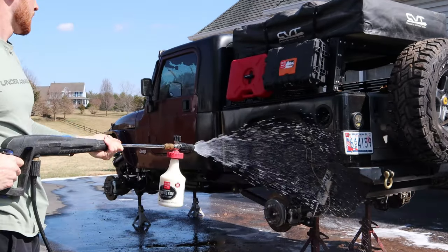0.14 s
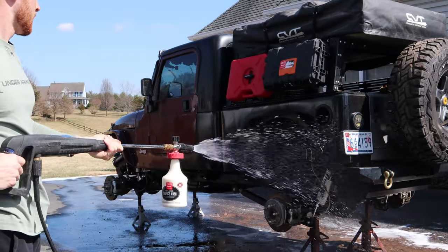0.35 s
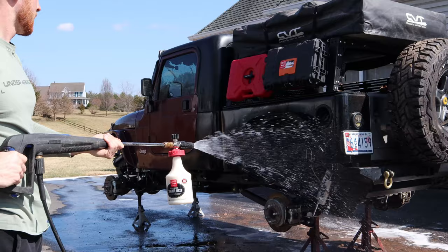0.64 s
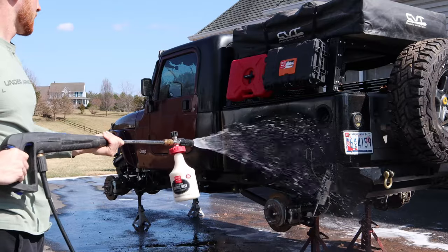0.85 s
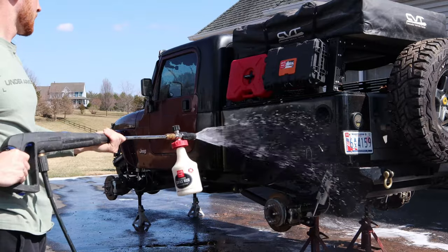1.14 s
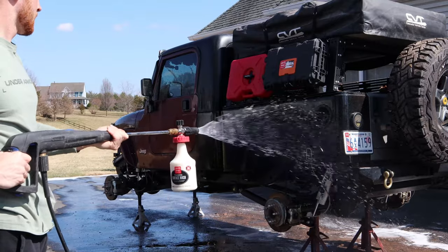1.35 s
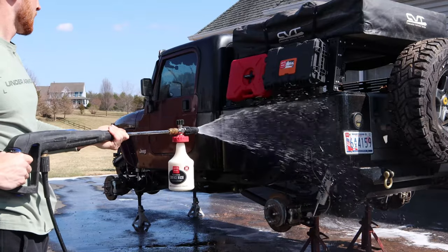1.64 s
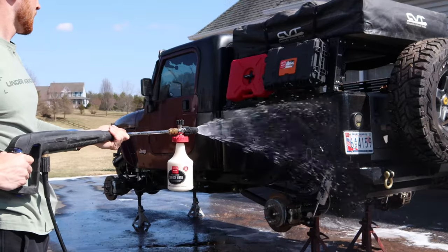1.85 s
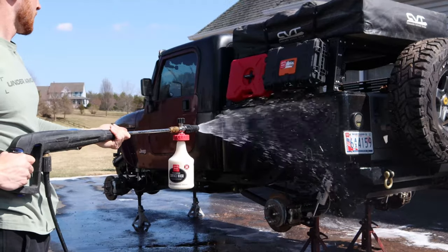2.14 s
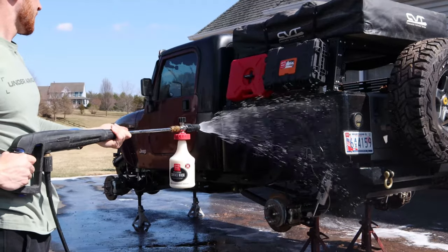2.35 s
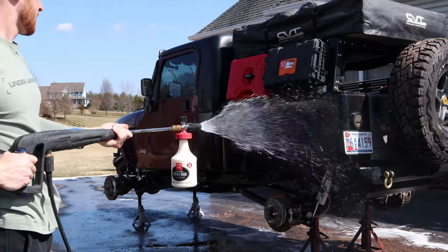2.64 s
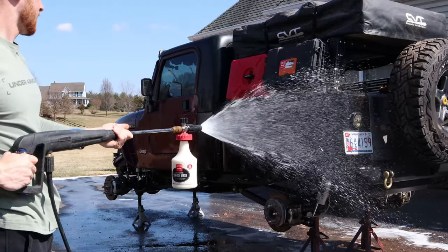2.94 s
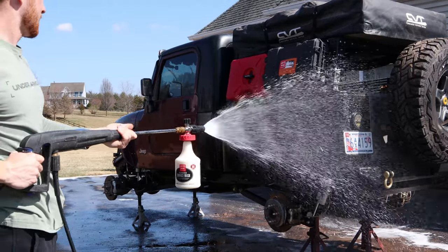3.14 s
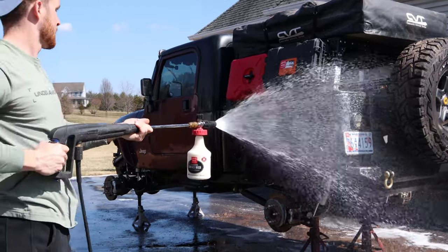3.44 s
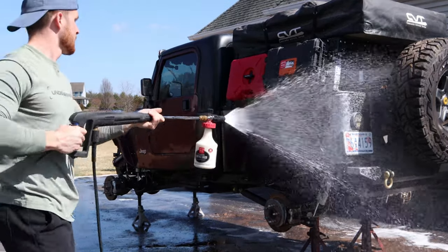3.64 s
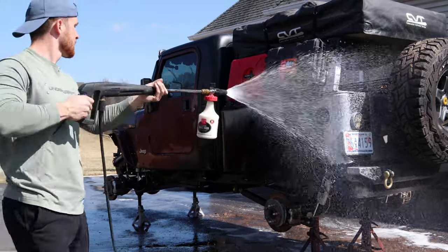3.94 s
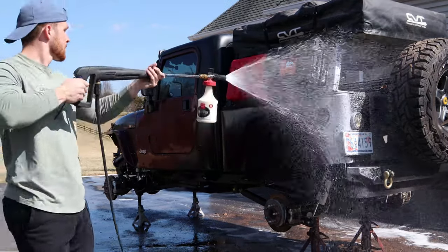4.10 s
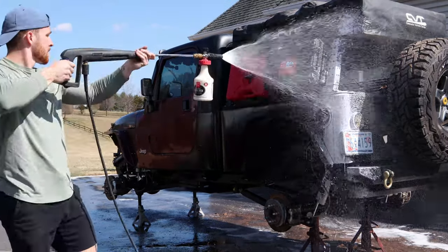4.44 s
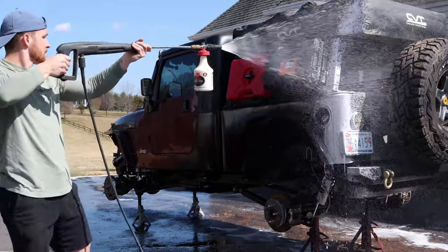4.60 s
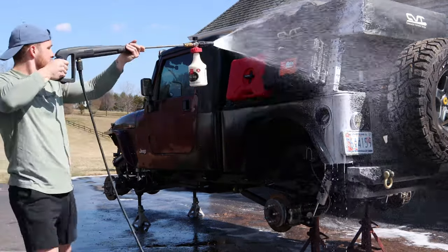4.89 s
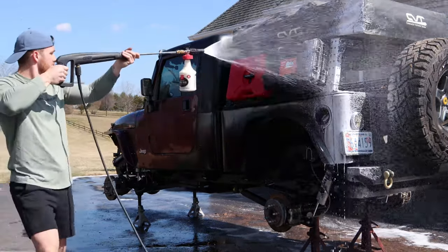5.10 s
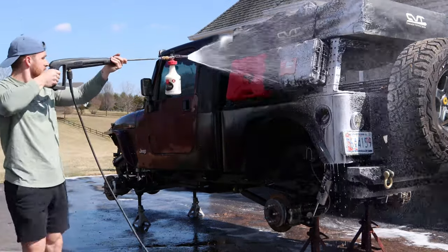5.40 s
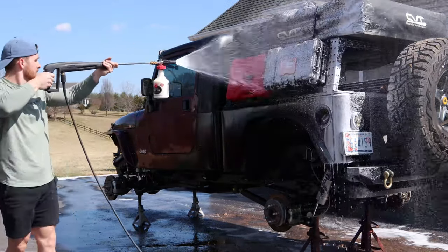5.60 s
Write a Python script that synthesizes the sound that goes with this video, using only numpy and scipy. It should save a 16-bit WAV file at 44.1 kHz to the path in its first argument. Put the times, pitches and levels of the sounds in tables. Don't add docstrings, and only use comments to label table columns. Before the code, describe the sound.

Rapid mechanical drone and rattle of a pressure washer, strongly to the left, over bright hissing spray with occasional wet slaps on bodywork.

```python
import sys
import numpy as np
from scipy import signal
from scipy.fft import rfft, irfft
from scipy.io import wavfile
from scipy.ndimage import uniform_filter1d

SR = 44100
rng = np.random.default_rng(int(sys.argv[2]) if len(sys.argv) > 2 else 0)


def master(y):
    cut = np.clip(np.atleast_2d(y).T, -1, 1)
    pcm = np.round(cut * 32767)
    wavfile.write(sys.argv[1], SR, pcm.astype(np.int16))


def undo_db(level):
    steps = np.asarray(level, float) / 20
    return 10 ** steps


N = 254016
HZ = np.maximum(np.fft.rfftfreq(N, 1 / SR), 1)
HOLD = 16
SHAFT_HZ = 70.505

# start_s, load (1 straining, 0 steady, -1 shifted)
PUMP_LOAD = [(0, .8), (.12, 1), (.45, 1), (.65, 0), (4.4, 0), (4.47, -.7), (4.6, -1), (4.93, -1),
             (5.04, -.4), (5.3, -.1), (5.45, .3), (5.76, .3)]
# freq_hz, level_db [dB per Hz]
CASING_COLOUR = [(90, -76.5), (176, -54.5), (387, -40), (669, -42.5), (1021, -43.5), (1900, -45.5),
                 (2450, -48.5), (3040, -53), (3900, -45), (5104, -47), (6230, -54.5), (7200, -50),
                 (8200, -59), (11000, -72)]
# freq_hz, left_minus_right_db
PORT_SHADOW = [(60, -.5), (110, -1), (200, 3.5), (380, 9.5), (700, 11.5), (1290, 15.5), (2380, 18),
               (4400, 19.5), (8120, 23), (15000, 26)]
# freq_hz, lag_rad
LAG_BETWEEN_PORTS = [(60, 0), (140, .4), (210, 1.1), (340, 1.4), (1030, 1.6), (3000, .8), (5300, 1.6),
                     (7200, 6.9), (15000, 17)]
# shaft_multiple, level_db, left_minus_right_db
GEAR_TONES = [(40, -44, 14), (45, -44, 21), (46, -42, 22), (49, -38, 20), (50, -28, 21), (52, -45, 19),
              (53, -45, 19), (59, -37, 22), (60, -39, 21), (61, -44, 25), (66, -40, 21), (68, -36, 25),
              (76, -45, 16), (78, -42, 33)]
# shaft_multiple, level_db, left_minus_right_db
FAN_TONES = [(93, -40, 19), (94, -47, 13), (96, -43, 17), (97, -46, 15), (98, -41, 18), (100, -32, 26),
             (101, -33, 15), (102, -38, 13), (103, -39, 17), (104, -42, 21), (106, -44, 20), (110, -48, 11),
             (111, -49, 15), (150, -55, 16)]


def on_log(table, hz):
    f, v = np.transpose(table)
    return np.interp(np.log(hz), np.log(f), v)


def curve(table):
    s, *columns = np.transpose(table)
    return [np.interp(np.arange(N) / SR, s, c) for c in columns]


def shifted_load():
    return np.clip(-curve(PUMP_LOAD)[0], 0, 1)


def level(x, db):
    return x * undo_db(db) / np.sqrt(np.mean(np.atleast_2d(x)[0] ** 2))


def walk(rate_hz):
    k, steps = int(SR / HOLD / rate_hz), N // HOLD
    held = np.repeat(rng.standard_normal(steps // k + 1), k)
    return 0.61 * uniform_filter1d(uniform_filter1d(held, k), k)[:steps]


def ports(near, other):
    # freq_hz, coherence [0-1]
    coherence = [(60, 0.87), (300, 0.78), (700, 0.93), (1400, 0.2), (3000, 0.7), (6000, 0), (9000, 0.1),
                 (15000, 0)]
    like = np.clip(on_log(coherence, HZ), 0, 1)
    late = near * np.exp(-1j * on_log(LAG_BETWEEN_PORTS, HZ))
    far = like * late + np.sqrt(1 - like ** 2) * other
    return np.array([near, far * undo_db(-on_log(PORT_SHADOW, HZ))])


def noise(colour, excite, flicker_db, gate=lambda hz: 1):
    both = ports(*rfft(excite)) * undo_db(on_log(colour, HZ))
    out, low_hz, high_hz = 0, colour[0][0], colour[-1][0]
    for hz in low_hz * 2 ** np.arange(0, np.log2(high_hz / low_hz) + .5, .5):
        band = np.cos(np.pi * np.clip(np.log2(HZ / hz), -.5, .5)) ** 2
        flicker = np.repeat(undo_db(flicker_db * walk(9)), HOLD)
        out = out + gate(hz) * flicker * irfft(both * band, N)
    return out


def order(turn, k, db, side_db, start):
    angle = ((k * turn + np.repeat(start, HOLD)) % (2 * np.pi)).astype(np.float32)
    size = np.sqrt(2) * np.repeat(undo_db(db), HOLD)
    lag = np.float32(on_log(LAG_BETWEEN_PORTS, k * SHAFT_HZ))
    return np.array([size * np.cos(angle), undo_db(-side_db) * size * np.cos(angle - lag)])


def shaft_turn():
    t = np.arange(N) / SR
    run_up_hz, run_up_s, sag_hz_per_s, ease_hz = 1.45, .25, .017, .06
    speed_hz = SHAFT_HZ - run_up_hz * np.exp(-t / run_up_s) - sag_hz_per_s * t + ease_hz * shifted_load()
    return 2 * np.pi * np.cumsum(speed_hz) / SR


def pump(turn):
    # shaft_multiple, steady_db, straining_db, warm_db, shifted_db
    knock_orders = [(1, -59, -59, -59, -61), (2, -58, -55, -57, -70), (3, -31, -30, -32, -42),
                    (4, -32, -37, -32, -26), (5, -23, -21, -26, -22), (6, -25, -26, -25, -30),
                    (7, -31, -37, -32, -25), (8, -29, -30, -28, -35), (9, -24, -22, -22, -32),
                    (10, -32, -29, -27, -23), (11, -32, -34, -32, -31), (12, -47, -41, -35, -45),
                    (13, -28, -30, -28, -41), (14, -30, -28, -30, -42), (15, -46, -39, -41, -31)]
    # shaft_multiple, level_db
    valve_orders = [(16, -41), (17, -40), (18, -43), (20, -37), (21, -43), (22, -39), (23, -42), (25, -40),
                    (26, -41), (27, -41), (28, -45), (30, -36), (31, -41)]
    casing_hz = np.array([429, 495, 550, 580, 876, 908, 956])
    warm_at_s, warming_s = 3.35, 0.53
    load = curve(PUMP_LOAD)[0][::HOLD]
    strain, shift = np.clip(load, 0, 1), np.clip(-load, 0, 1)
    warm = np.clip((np.arange(len(load)) * HOLD / SR - warm_at_s) / warming_s, 0, 1)
    rows = knock_orders + [(k, db, db + 1.5, db, db - 1.5) for k, db in valve_orders]
    out, chances = 0, rng.uniform(-np.pi, np.pi, len(rows))
    for (k, db, strain_db, warm_db, shift_db), chance in zip(rows, chances):
        hz = k * SHAFT_HZ
        lag = 0.929 * np.sum(np.pi / 2 + np.arctan(np.subtract(hz, casing_hz) / 12))
        start = 0.448 * k - 3.3 - lag + chance * (k >= valve_orders[0][0])
        rest_db = db + warm * (warm_db - db)
        now_db = rest_db + strain * (strain_db - rest_db) + shift * (shift_db - rest_db)
        now_db = now_db + 0.19 * walk(9)
        out = out + order(turn, k, now_db, on_log(PORT_SHADOW, hz), start + .12 * walk(14))
    return out


def whine(turn, top_db):
    out, rows = 0, GEAR_TONES + FAN_TONES
    for (k, db, side_db), chance in zip(rows, rng.uniform(-np.pi, np.pi, len(rows))):
        start = 1.35 * k + .1 * chance if k > 95 else -1.1 * k + .3 * chance
        waver_db = np.clip(.45 * (-28.7 - db), .3, 4.5) * walk(22)
        waver_db = waver_db + top_db * (k > 55)
        out = out + order(turn, k, db + waver_db, side_db, start + .2 * walk(18))
    return out


def rattle(turn):
    # freq_hz, depth [0-1], place [fraction of a turn]
    modulation = [(300, 0, 0.066), (1010, 0.5, 0.56), (1810, 0.15, 0.65), (2760, 0.31, 0.066),
                  (4500, 0, 0.34), (6000, 0.32, 0.63), (7500, 0.42, 0.51)]
    hz, depth, place = np.transpose(modulation)
    calm_db = -1.5 * shifted_load()

    def gate(f):
        moment = 2 * np.pi * np.interp(f, hz, place)
        beat = 1 + np.interp(f, hz, depth) * np.cos(turn - moment)
        return beat * undo_db(calm_db * (700 < f < 1900))

    return noise(CASING_COLOUR, rng.standard_normal((2, N)), flicker_db=-0.1, gate=gate)


def clatter(turn):
    size = 4096
    k = np.setdiff1d(np.arange(32, 114), np.array(GEAR_TONES + FAN_TONES)[:, 0])
    hz = k * SHAFT_HZ
    uneven, phase = rng.uniform(-1, 1, (len(k), 2)).T
    lines = np.zeros((2, size // 2 + 1), complex)
    lines[0, k] = undo_db(on_log(CASING_COLOUR, hz) + 4 * uneven) * np.exp(1j * np.pi * phase)
    shade = undo_db(-on_log(PORT_SHADOW, hz))
    lines[1, k] = lines[0, k] * shade * np.exp(-1j * on_log(LAG_BETWEEN_PORTS, hz))
    place = (turn / (2 * np.pi) + .0004 * np.repeat(walk(15), HOLD)) * size
    return np.array([np.interp(place, np.arange(size), one, period=size) for one in irfft(lines, size)])


def cam(turn):
    # shaft_multiple, level_db
    cam_orders = [(2.545, -56), (3.545, -50), (5.71, -43), (6.545, -43), (8.545, -43), (9.455, -42),
                  (10.545, -41), (10.7, -41), (13.545, -44), (18.545, -45), (26.545, -45), (54.455, -44),
                  (68.19, -37), (104.545, -45)]
    out, starts = 0, rng.uniform(-np.pi, np.pi, len(cam_orders))
    for (k, db), start in zip(cam_orders, starts):
        now_db, side_db = db + 1.5 * walk(14), on_log(PORT_SHADOW, k * SHAFT_HZ)
        out = out + order(turn, k, now_db, side_db, start + .2 * walk(7.3))
    return out


def spray():
    # freq_hz, level_db [dB per Hz]
    jet_colour = [(1500, -22), (4000, -5), (6000, 3), (8200, -5.5), (10500, -3), (12500, -8), (14500, -10),
                  (16000, -13)]
    # start_s, level_db as the lance sweeps
    lance_sweep = [(0.0, -41.5), (0.22, -40.5), (3.8, -43), (3.93, -41), (4.57, -43), (5.05, -43),
                   (5.21, -41), (5.26, -37.5), (5.41, -38), (5.73, -39.5), (5.76, -39.5)]
    sweep_db = curve(lance_sweep)[0]
    sweep_db = sweep_db - sweep_db.mean()
    drops = (rng.random((2, N)) < .06) * undo_db(3.3 * rng.exponential(size=(2, N)))
    jet = noise(jet_colour, rng.standard_normal((2, N)) * (1 + 0.33 * drops), flicker_db=1.3)
    patches = undo_db((1.1 + .4 * np.clip(sweep_db, 0, 6)) * np.repeat(walk(45), HOLD))
    return undo_db(0.99 * sweep_db) * level(patches * jet, -30.0)


def splats():
    # start_s, level_db, centre_hz
    foam_blobs = [(0.8494, -21, 7120), (1.0594, -10, 7050), (1.3994, -27, 7110), (1.9794, -15, 7110),
                  (2.8853, -16, 4160), (5.2393, -35, 4190), (5.3195, -26, 7110), (5.3694, -17, 4230),
                  (5.5596, -16, 4790), (5.5937, -19, 7040), (5.7094, -22, 4800)]
    out, t = np.zeros(N), np.arange(600) / SR
    for (s, db, hz), grit in zip(foam_blobs, rng.standard_normal((len(foam_blobs), 600))):
        sos = signal.butter(2, [.7 * hz, 1.6 * hz], "band", fs=SR, output="sos")
        i = int(s * SR)
        out[i:i + 600] += undo_db(db - 8) * signal.sosfilt(sos, grit) * np.exp(-t / .004)
    return irfft(ports(rfft(out), rfft(np.roll(out, 40))), N)


def open_air():
    # freq_hz, level_db [dB per Hz]
    air_colour = [(12, -3), (30, -8), (54, -6), (100, 5), (160, -3), (250, -27)]
    return level(noise(air_colour, rng.standard_normal((2, N)), flicker_db=5.0), -57.5)


def scene():
    # start_s, shake_db of the machine
    machine_shake = [(0.0, -24.5), (0.05, -22.5), (1.28, -24.5), (3.24, -25.5), (4.38, -23.5), (4.52, -24),
                     (5.7, -25.5), (5.76, -25)]
    turn = shaft_turn()
    shake_db = curve(machine_shake)[0]
    shake_db = shake_db - shake_db.mean()
    tones = undo_db(0.24 * shake_db + 0.05) * pump(turn)
    tones = tones + undo_db(-0.37) * whine(turn, 0.2 * shake_db[::HOLD]) + cam(turn)
    knocks = undo_db(0.9 * shake_db) * level(rattle(turn), -20.5) + level(clatter(turn), -31.5)
    return tones + knocks + spray() + splats() + open_air()


def top_cut(x):
    return signal.sosfilt(signal.butter(12, 15870, fs=SR, output="sos"), x)


def record(dry):
    return top_cut(dry)


dry = scene()
out = record(dry)
master(out)
```